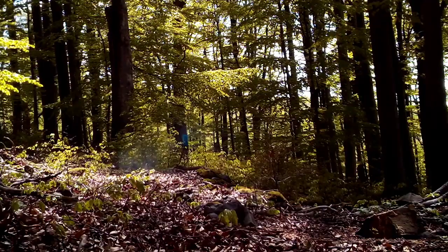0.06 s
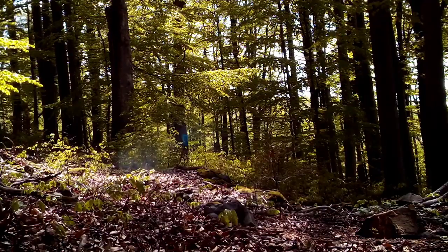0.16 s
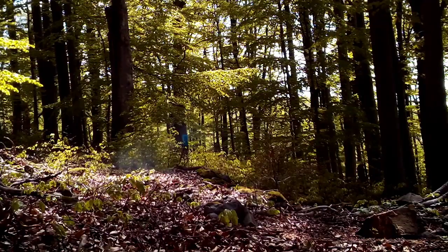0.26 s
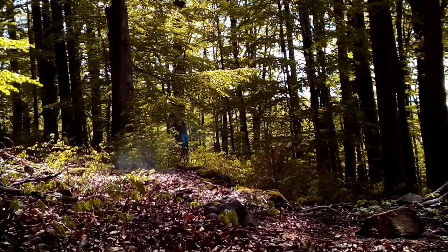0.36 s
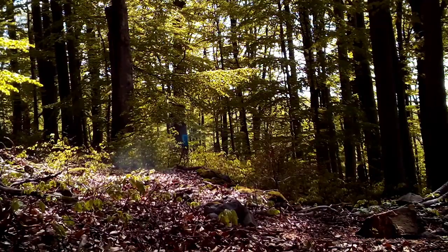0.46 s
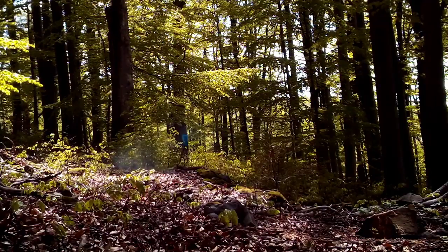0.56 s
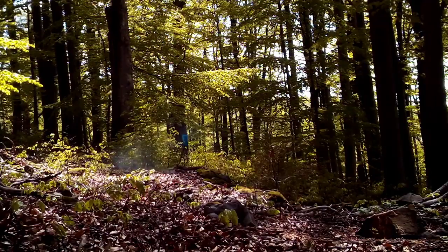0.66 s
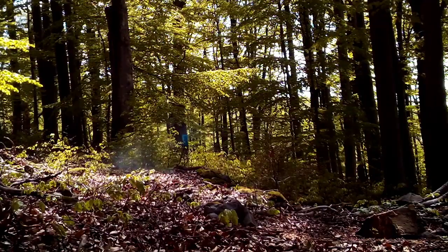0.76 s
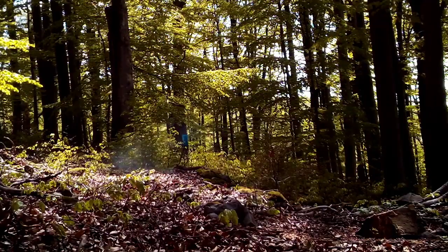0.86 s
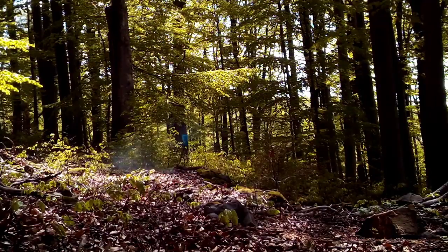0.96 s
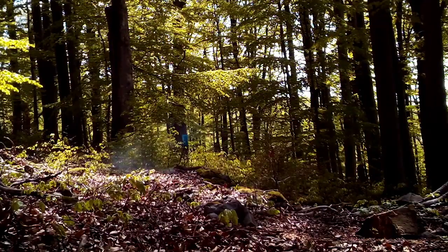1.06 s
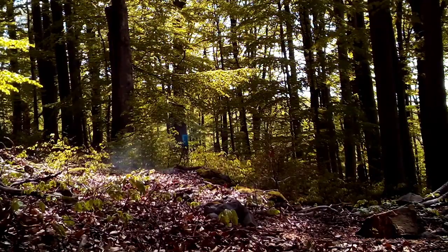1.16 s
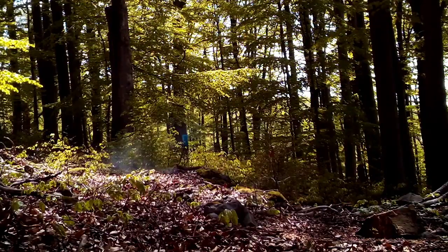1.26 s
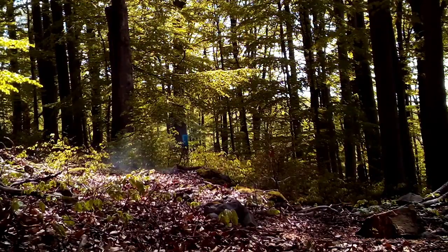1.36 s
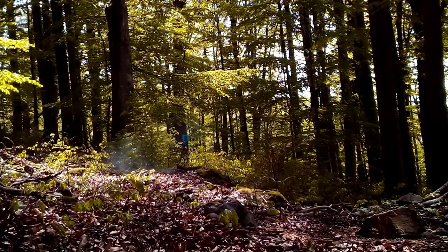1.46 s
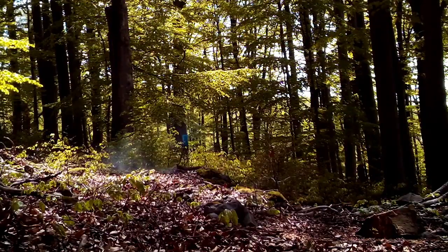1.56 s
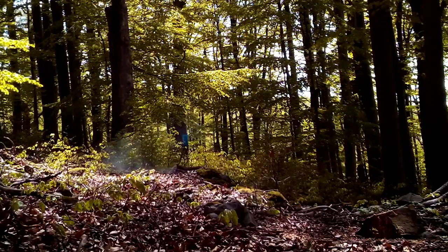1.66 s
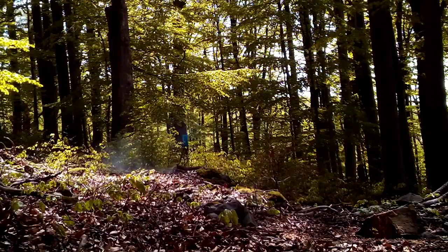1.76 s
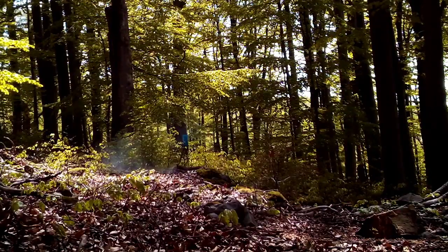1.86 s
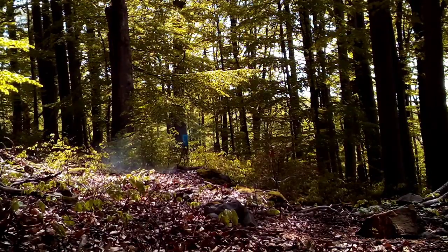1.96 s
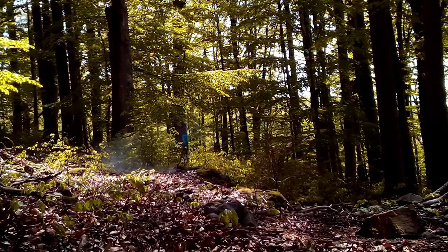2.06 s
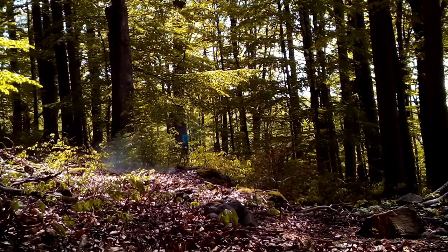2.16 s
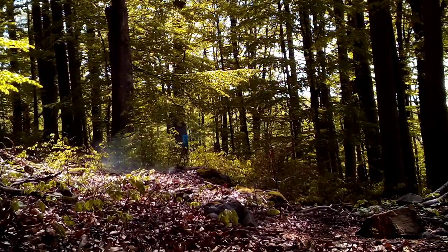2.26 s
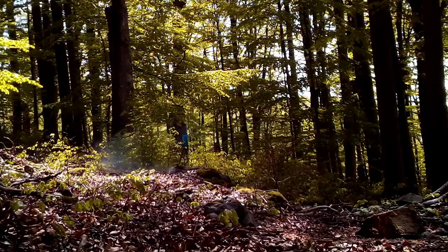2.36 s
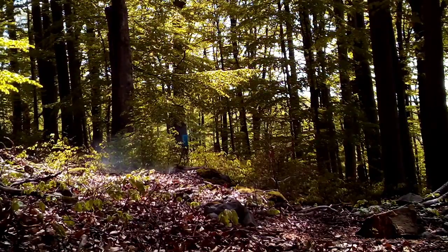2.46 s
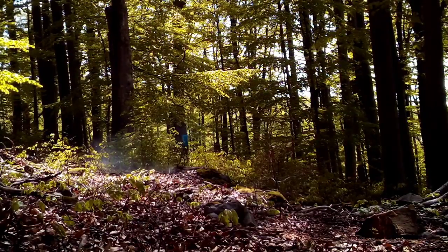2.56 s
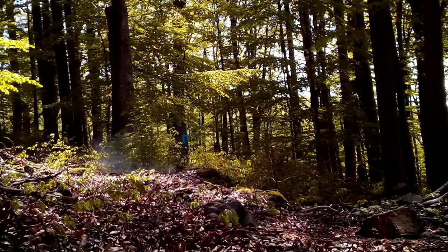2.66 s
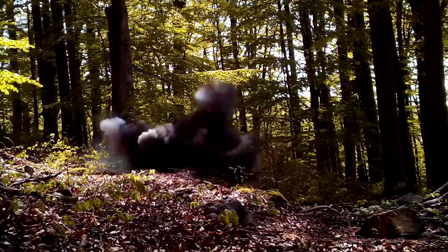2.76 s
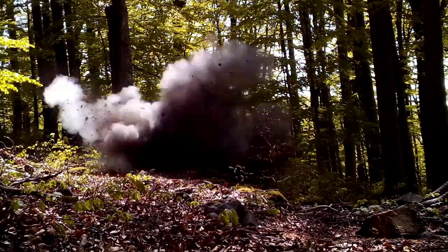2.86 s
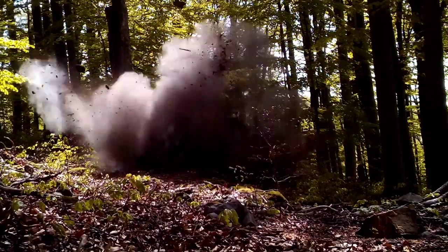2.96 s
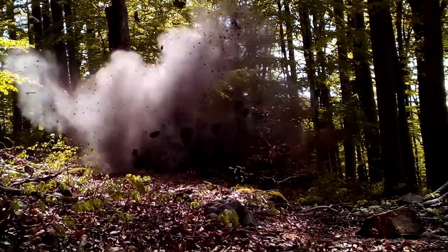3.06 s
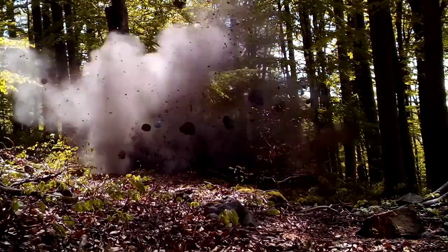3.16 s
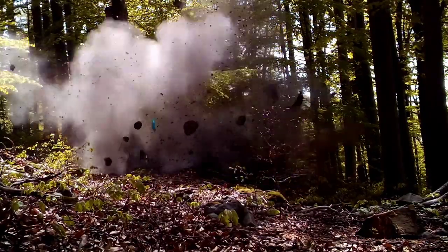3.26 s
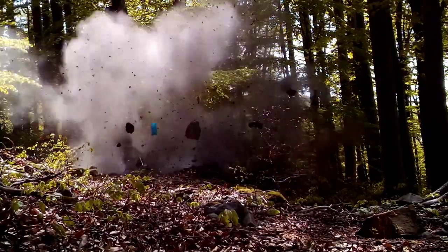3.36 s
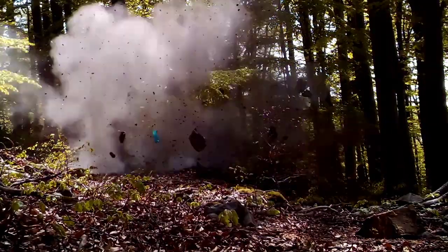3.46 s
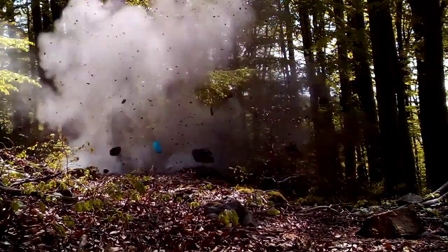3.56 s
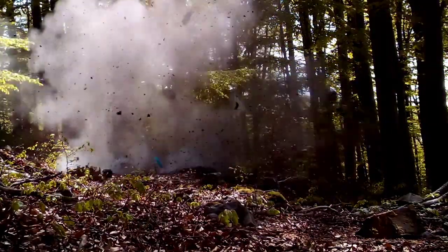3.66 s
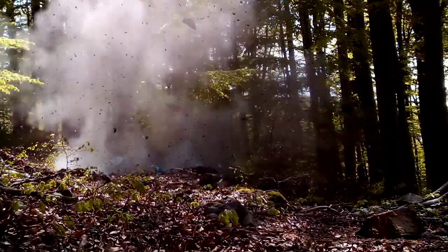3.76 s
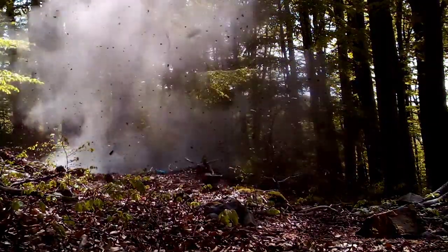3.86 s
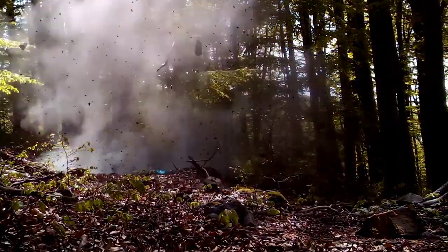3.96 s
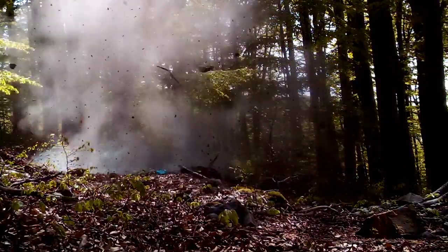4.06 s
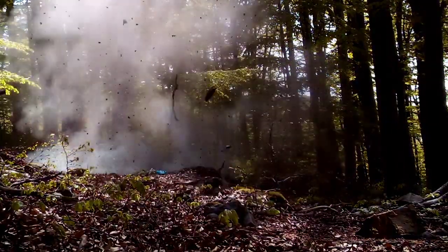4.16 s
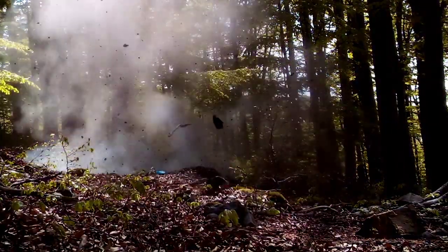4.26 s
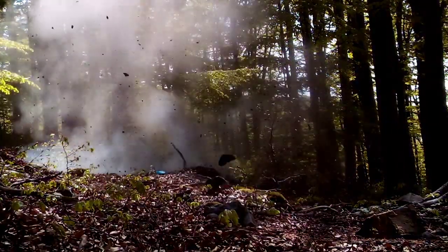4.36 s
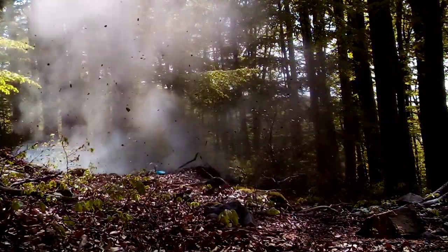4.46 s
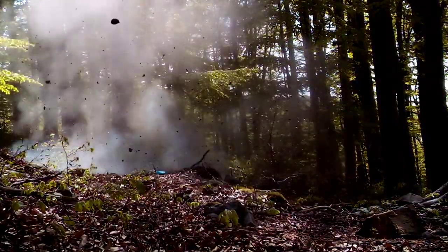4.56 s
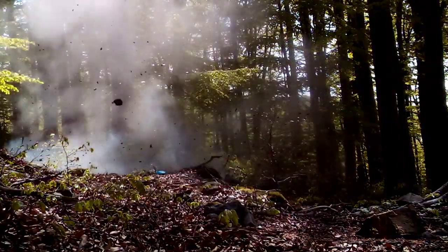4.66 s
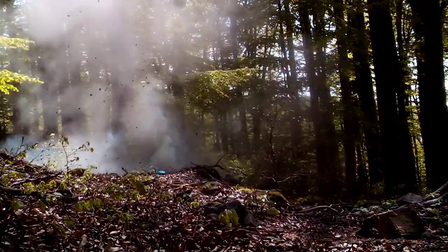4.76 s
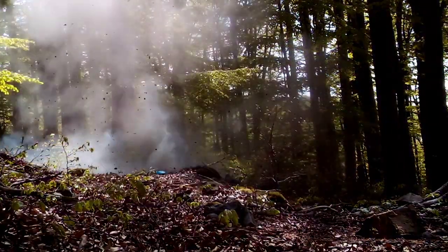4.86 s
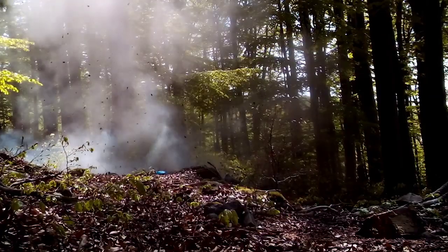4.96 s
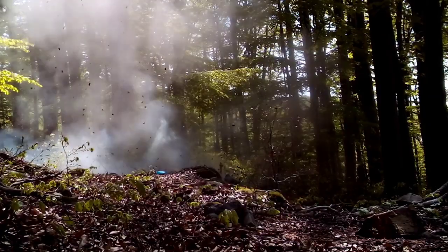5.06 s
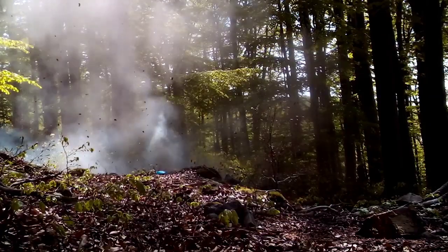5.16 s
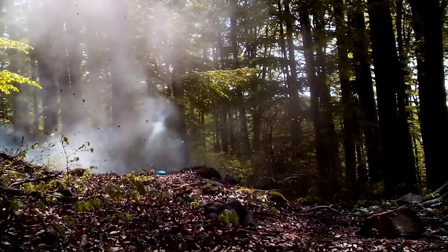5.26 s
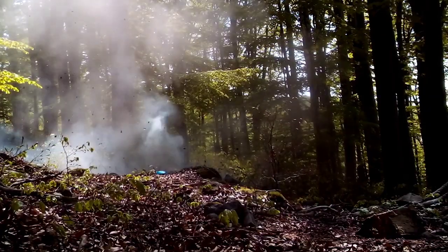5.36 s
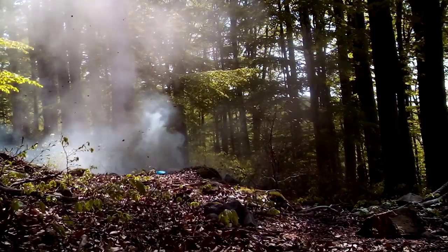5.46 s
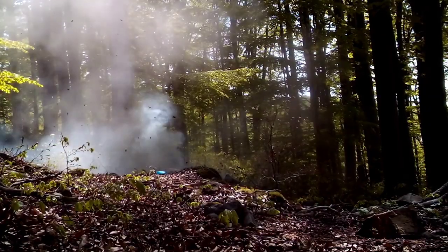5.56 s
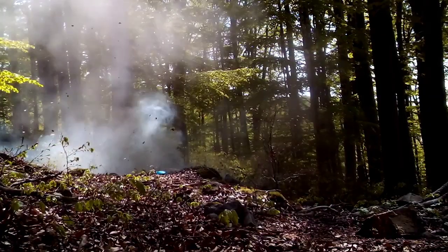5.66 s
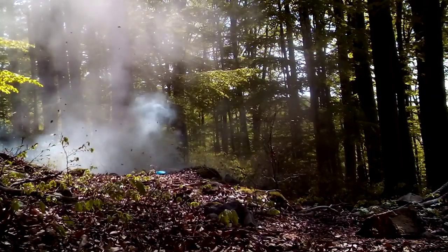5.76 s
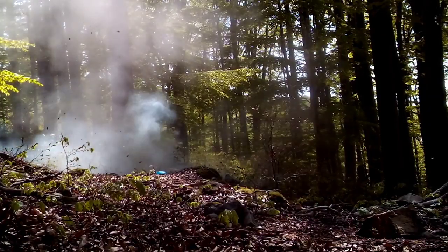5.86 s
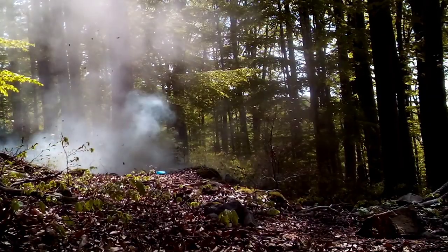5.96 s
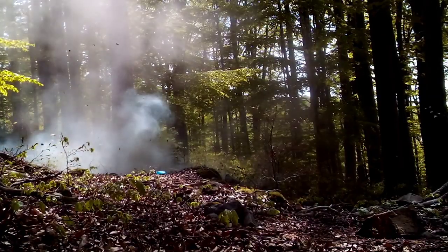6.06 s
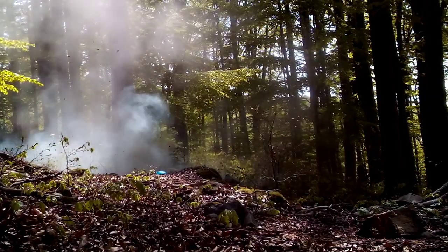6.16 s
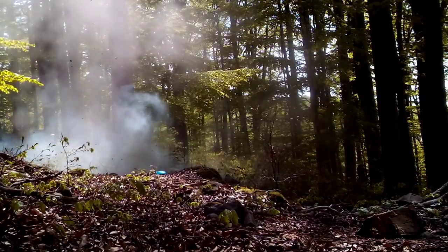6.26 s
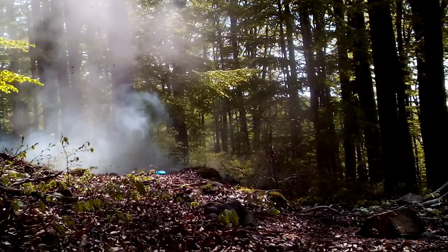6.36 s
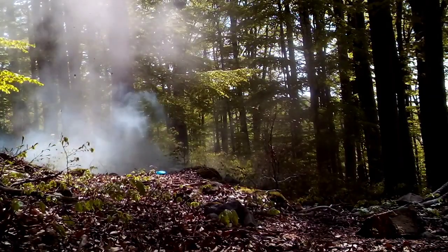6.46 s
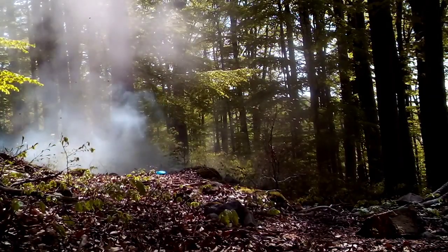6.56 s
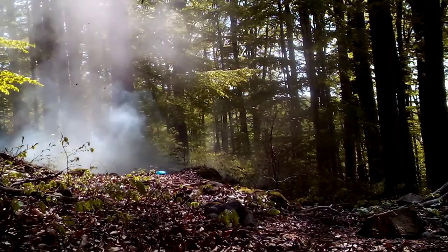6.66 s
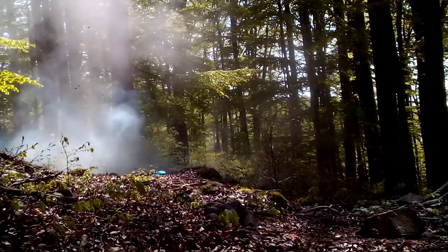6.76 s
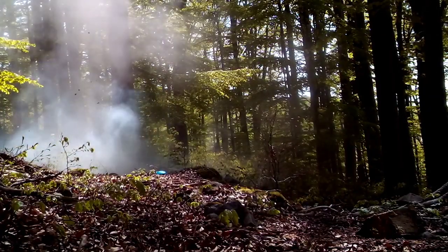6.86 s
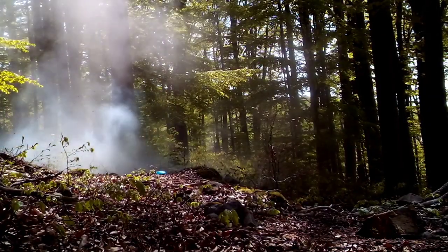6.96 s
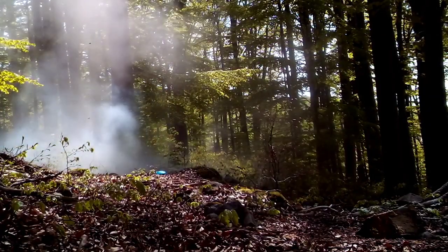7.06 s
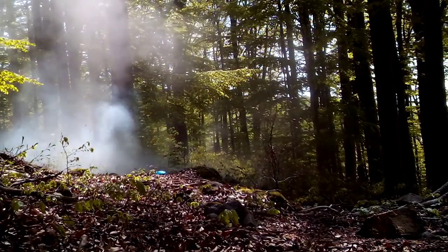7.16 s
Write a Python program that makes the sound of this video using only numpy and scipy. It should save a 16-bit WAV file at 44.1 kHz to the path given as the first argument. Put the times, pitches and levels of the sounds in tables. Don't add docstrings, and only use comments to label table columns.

```python
import sys
import numpy as np
from scipy import signal
from scipy.io import wavfile
from scipy.ndimage import uniform_filter1d

SR = 44100
rng = np.random.default_rng(int(sys.argv[2]) if len(sys.argv) > 2 else 0)


def dump(signal):
    limited = np.clip(np.atleast_2d(signal).T, -1, 1)
    pcm = np.round(limited * 32767).astype(np.int16)
    wavfile.write(sys.argv[1], SR, pcm)


def rack_gain(trim_db):
    fader = np.asarray(trim_db, float)
    return 10 ** (fader / 20)


N = 317520
T = np.arange(N) / SR

# [f/Hz, level/dB per Hz]
STILL_TONE = [(12, -48), (20, -31), (49, -1.5), (117, -0.5), (244, -6), (404, -10), (583, -13), (839, -15),
              (1080, -17.5), (5830, -24), (10200, -40), (13500, -37), (15000, -30), (16500, -50)]
# [f/Hz, level/dB]
MIC_TONE = [(20, -18), (60, 1.5), (6500, 1.5), (7400, -5), (8200, -12.5), (11000, -16), (13800, -27),
            (15000, -15.5), (15600, -23), (15900, -49), (17000, -55)]

# trills of one repeated note [t/s, spacing/s, level/dB, f/Hz], and notes in each
TRILLS = [
    (.3002, .0586, -58.5, 4290),
    (.4838, .059, -61.5, 3420),
]
TRILL_COUNTS = (10, 5)
# [length/s, arch/Hz, fall/Hz]
TRILL_SHAPES = [(.028, 150, 320), (0.033, 45, 60)]
LONG_SHAPE = (.1, 150, 120)
DIVE_SHAPE = (0.05, 350, 100)
FLAT_SHAPE = (.045, 22, 20)
BUZZ_SHAPE = (0.08, 123, 150)
DROP_SHAPE = (.07, -180, 1500)
# [t/s, level/dB, f/Hz]
LONGS = [
    (.9447, -57, 4450),
    (1.1473, -59, 4260),
    (1.3294, -61, 4240),
    (1.5753, -60.5, 4320),
]
DIVES = [
    (.832, -58, 3240),
    (.98, -49.5, 3210),
    (1.172, -48.5, 3230),
    (1.362, -49, 3230),
]
FLATS = [
    (.004, -64, 4660),
    (1.08, -59, 3550),
    (1.27, -68, 3500),
    (1.46, -68, 3480),
    (1.48, -73, 5950),
    (1.639, -49, 3340),
    (1.7, -63, 3350),
    (1.79, -70, 5870),
    (1.79, -65, 2900),
]
BUZZES = [
    (.19, -59, 5350),
    (.165, -60, 4850),
    (.19, -54, 4900),
    (.21, -56, 4750),
]
DROPS = [
    (.842, -57, 3450),
    (1.015, -53, 3400),
    (1.205, -52, 3350),
    (1.395, -55, 3350),
]

# [t/s, level/dB, coarseness 0-1]
SHOWER = [
    (3.3, -27.5, 0.15),
    (4.18, -33.5, 0.13),
    (4.69, -29.5, 0.56),
    (4.94, -32.5, 0.56),
    (5.42, -34, 0.32),
    (5.67, -39.5, 0.2),
    (6.4, -40, 0.16),
    (6.87, -49.5, 0.25),
    (7.2, -54, 0.36),
]
# [f/Hz, level/dB per Hz]
FINE_TONE = [(290, -35), (500, -5), (1000, -12), (1110, -8), (1220, -17), (2320, -12), (3900, -7),
             (7000, -11), (9100, -41.5), (15400, -120)]
COARSE_TONE = [(180, -33), (300, -9), (445, -2.5), (557, -9), (745, -5.5), (1380, -12.5), (3620, -15),
               (7000, -10.5), (9100, -42), (15400, -120)]
# [f/Hz, level/dB]
FAR_TONE = [(1000, -0.5), (1400, -7.5), (2200, -9.5), (3300, 0), (7000, -1.5), (9000, -4.5), (16000, -7.5)]
# [t/s, over/s]
THINNING = (4.77, 2.7)
DRIFT = (5.3, .4)
GRIT_HZ = [2900, 3400, 4000, 4500, 5100, 5700, 6300, 6900]
# [t/s, level/dB, decay/s, coarseness 0-1]
CLODS = [(3.8, -23.5, 0.14, 0.25), (4.1, -27.5, 0.086, .3), (4.3, -32, 0.11, 0.4), (4.58, -26, 0.1, .4),
         (4.925, -27, .05, 0.4), (5.127, -25, .012, 0.9), (5.194, -24, 0.0035, 0.1),
         (5.298, -20, .006, 0.8), (5.406, -16.5, 0.0097, 0.34), (5.415, -40, 0.012, .7),
         (5.479, -12.5, 0.0053, 0.55), (5.54, -25.5, 0.0092, 0.03), (5.637, -11.5, 0.0057, 0.5),
         (5.805, -24, 0.019, 0.27), (6.022, -9.5, 0.024, 0.57), (6.065, -25, 0.021, 0.2),
         (6.271, -27, 0.039, .1), (6.468, -29, 0.022, 0.15), (6.51, -30, 0.032, 0.5),
         (6.657, -27, 0.022, 0.6), (6.82, -36, 0.023, 0.6), (7.078, -37, .012, .7)]

# [t/s, peak level/dB,
# f/Hz]
TICKS = [(6.2896, -29, 8630), (6.3001, -26, 8290), (6.3405, -33, 8750), (6.4208, -35, 10100),
         (6.4687, -22, 14500), (6.495, -36, 11000), (6.5685, -42, 9610), (6.5855, -43, 10400),
         (6.6304, -39, 11000), (6.6633, -30, 9710), (6.672, -38, 11000), (6.8329, -31, 10000),
         (6.8329, -33, 13000), (7.0803, -47, 9210), (6.718, -37, 3600), (6.893, -40, 4000),
         (6.945, -40, 4600), (7.0085, -45, 4500), (7.0525, -38, 4800), (7.102, -42, 2500),
         (7.125, -41, 6300), (7.162, -45, 6200), (7.178, -40, 4500), (7.1875, -27, 9800),
         (7.1875, -38, 6500), (7.1866, -15, 14600)]
# [t/s, peak level/dB, f/Hz, t60/s]
PINGS = [(4.134, -21, 5000, .008), (4.18, -24, 4800, .008), (4.3555, -24, 6400, .008),
         (7.068, -36, 125, .12), (4.599, -20, 140, .15), (4.737, -24, 330, .05), (4.8535, -20, 3500, .008),
         (4.8865, -26, 2000, .01), (4.8975, -30, 2900, .01), (5.036, -28, 250, .08),
         (5.0962, -24, 1100, .015), (5.116, -32, 1500, .01), (5.1365, -20, 150, .07),
         (5.139, -30, 1500, .012), (5.147, -30, 1200, .01), (5.152, -22, 1700, .008),
         (5.1978, -20, 3100, .008), (5.1985, -26, 6600, .012), (5.2485, -16, 5800, .01),
         (5.2486, -16, 3700, .012), (5.259, -28, 4600, .012), (5.2865, -24, 5000, .008),
         (5.2866, -27, 3200, .006), (5.2995, -15, 1300, .006), (5.2993, -20, 2900, .006),
         (5.306, -28, 900, .012), (5.631, -26, 850, .012), (5.6395, -21, 5000, .012),
         (5.6405, -19, 3400, .015), (5.642, -15, 1100, .012), (5.654, -19, 1650, .016),
         (5.6543, -21, 3100, .009), (5.664, -25, 1000, .015), (5.692, -33, 3500, .015),
         (6.3387, -32, 2100, .006)]
# [t/s, peak level/dB, f/Hz]
SNAPS = [(3.771, -33, 9360), (3.8178, -27, 10200), (4.1323, -29.5, 9560), (4.2333, -32, 8800),
         (4.3279, -36, 9200), (4.3548, -29, 8530), (4.5766, -32, 9840), (4.8487, -25, 15400),
         (4.959, -23, 14900), (5.0182, -25.5, 8600), (5.0957, -30, 8540), (5.1964, -16.5, 14700),
         (5.2314, -36, 10200), (5.2476, -21, 10500), (5.2852, -41, 8510), (5.297, -42, 9650),
         (5.387, -39, 8820), (5.408, -29, 9240), (5.4803, -33, 8600), (5.5387, -36, 15400),
         (5.6374, -36, 15100), (5.816, -31, 8600), (5.9412, -43, 8510), (6.0045, -20.5, 8700),
         (6.0265, -27, 14700), (6.469, -29, 11500), (6.6636, -48, 9700), (6.6824, -35, 8300),
         (6.8332, -50, 10100), (7.187, -30, 14900)]
# [t/s, peak level/dB, ring f/Hz]
CHIPS = [(1.2364, -52, 3270), (1.263, -20.5, 6140), (5.003, -15, 4270), (5.2486, -15, 4600),
         (5.2583, -22, 4610), (5.2869, -23, 4660), (5.4101, -18, 6360), (5.5154, -21, 3200),
         (5.631, -21, 6700), (5.809, -25, 5020), (5.9418, -14.5, 6600), (6.0052, -8, 4070),
         (6.126, -21, 3830), (6.285, -24, 3650), (6.3387, -21.5, 4250), (6.4216, -33, 4340),
         (6.4631, -17.5, 5350), (6.6274, -29, 4540), (6.6312, -28.5, 2450), (6.662, -25, 3550),
         (6.683, -19.5, 4400), (6.7352, -29, 3800), (6.7562, -24.5, 4430), (6.824, -29, 3450),
         (6.8344, -18, 6060), (6.8653, -30, 3400), (6.8994, -20.5, 3830), (7.0816, -32, 4550),
         (7.1876, -28, 4100)]
# [thud level/dB against the click, thud f/Hz]
CHIP_THUD = (-44, 270)
# [t/s, peak level/dB, ring f/Hz, thud level/dB against the click, thud f/Hz]
STONES = [(3.8183, -8, 1860, -10, 115), (3.8494, -9, 2480, -8, 168), (4.1299, -17, 2270, -3, 205),
          (4.2304, -23, 1980, -1, 320), (4.356, -20.5, 1940, 0, 177), (4.4101, -20.5, 1520, -2, 135),
          (4.599, -30, 1790, -4, 138), (4.8864, -18, 1980, -2, 102), (4.897, -27, 2970, 2, 161),
          (4.9436, -25, 4470, 3, 355), (4.96, -15, 6370, -11.5, 213), (5.018, -10, 6140, -29, 170),
          (5.0958, -14, 4900, -13, 755), (5.1291, -14, 1100, -4, 142), (5.151, -21.5, 1570, -17, 204),
          (5.1973, -12.5, 2900, -6, 1240), (5.2991, -9, 2200, -10, 700), (5.4825, -12.5, 4430, -12.5, 815),
          (5.6391, -11, 3270, -4.5, 1180), (5.6538, -15, 1670, -11.5, 810), (5.6929, -28, 3430, -5, 229),
          (6.025, -17.5, 3850, -6, 415), (6.03, -13, 1800, -1, 500)]
# [f/Hz, level/dB, t60/s]
STONE_BLOW = (4.8495, 14.2, 0.00026)
STONE_MODES = [(291, -13.5, 0.064), (484, -3.5, 0.032), (700, 1, 0.012), (943, 1, 0.017), (1470, 0.5, 0.01),
               (2000, -2, 0.011), (2586, -6, 0.008), (4428, -23, .006)]
LOG_BLOW = (5.657, -10, 0.0095)
LOG_MODES = [(234, -3, 0.046), (366.4, 6.5, 0.032), (444, -5.5, 0.042)]

# [t/s, level/dB]
ROAR = [
    (2.9035, -3.5),
    (2.915, -5.5),
    (3.13, -11.5),
    (3.6, -14.5),
    (4.08, -21),
    (4.71, -32.5),
    (5.4, -41.5),
    (6.11, -45.5),
    (7.1, -66.5),
]
# [f/Hz, level/dB per Hz]
ROAR_TONE = [(120, -24), (200, -5.5), (243, -5), (415, -3.5), (481, -4), (730, -3.5), (1380, -8),
             (2150, -11.5), (3480, -11.5), (7000, -12), (9100, -36), (15400, -120)]
# [f/Hz, loss/dB per second]
AIR_LOSS = [(300, 1.5), (1000, 1), (2000, 3.5), (4000, 8.5), (7000, 27.5), (10000, 49), (13000, 81),
            (16000, 65)]
# [t/s, level/dB, rise/s, decay/s]
SLOPE_ECHO = (2.958, -.5, .001, 0.1087)
# [t/s, length/s]
BLANKS = [
    (2.9075, .0017),
    (2.9132, .002),
    (2.9475, .0015),
    (2.9518, .002),
    (2.9745, .0012),
]
# [t/s, peak level/dB, f/Hz, t60/s]
ANSWERS = [
    (2.9085, 13, 235, .035),
    (2.9612, 6, 750, .025),
    (2.9748, 12, 110, .06),
    (2.9885, 7, 113, .13),
    (3.0085, 7, 900, .012),
    (3.063, 3, 95, .2),
]

# [t/s, level/dB]
RUMBLE = [
    (2.9, -6),
    (3.05, -10),
    (3.14, -17),
    (3.45, -17.5),
    (4.0, -26),
    (4.6, -30.5),
    (4.95, -47.5),
    (6.25, -40.5),
    (7.2, -54),
]
# [f/Hz, level/dB per Hz]
RUMBLE_TONE = [(12, -70), (20, -23), (30, -8), (67, -2.5), (86, 1), (145, 2.5), (236, -7), (348, -11.5),
               (400, -11), (520, -31.5), (880, -120)]
# [t/s, level/dB]
THUMPS = [(2.925, -8), (2.965, -3), (3.05, -8), (3.4, -24), (4.03, -36), (4.595, -38), (4.74, -32),
          (5.025, -32), (5.128, -31), (5.298, -36), (5.655, -39.5), (5.88, -56), (6.92, -55),
          (7.075, -49.5)]
# [f/Hz, level/dB, t60/s]
CRATER_BLOW = (2.9138, 14.5, 0.001)
CRATER_MODES = [(95, -9, 0.6), (118, 0, 0.28), (205, -10, 0.3), (300, -14, 0.2), (62, -12, 0.87)]
SLOPE_BLOW = (2.9427, 15, .001)
SLOPE_MODES = [(138, 0, .2), (105, -12, .4)]
FAR_BLOW = (3.0268, 8.5, .002)
FAR_MODES = [(136, 0, .3)]
# [t/s, level/dB, f/Hz, length/s]
GROUND_WAVE = (2.866, -21, 95, .021)
# [t/s, level/dB, rise/s, push length/s]
SHOCKS = [
    (2.8869, 13, 0.00005, 0.0011),
    (2.889, 11, 0.0013, 0.0083),
    (2.8925, 15, 0.00007, 0.0017),
    (2.935, 6, 0.000043, 0.00023),
    (2.946, 2, .00005, .0002),
    (2.962, 5, 0.000065, 0.0003),
]


def evened(x):
    return x / np.sqrt(np.mean(x ** 2) + 1e-20)


def smooth_noise(size):
    return evened(uniform_filter1d(rng.standard_normal(N), size=size))


def read(points, hz):
    f, value = np.transpose(points)
    return np.interp(np.log(hz + 1), np.log(f + 1), value)


def add(mix, s, sound):
    part = mix[round(s * SR):][:len(sound)]
    part += sound[:len(part)]


def level(rows, column=1):
    rows = np.array(rows)
    return np.interp(T, rows[:, 0], rows[:, column], left=-150)


def coloured(x, tone):
    tone_db = read(tone, abs(np.fft.fftfreq(8192, 1 / SR)))
    log_gain = np.log(rack_gain(np.maximum(tone_db, -100)))
    taps = np.fft.ifft(np.exp(np.conj(signal.hilbert(log_gain)))).real[:4096]
    return signal.oaconvolve(x, taps)[:len(x)]


def ring(x, hz, t60):
    r = np.exp(-np.log(1000) / (t60 * SR))
    pole = r * np.exp(2j * np.pi * hz / SR)
    return (1 - r) * 2 * signal.lfilter([1], [1, -pole], x).real


def grains(per_s, spread_db):
    size = rack_gain(spread_db * np.minimum(rng.exponential(1, N), 5))
    hits = rng.random(N) < per_s / SR
    return evened(size * rng.choice([-1., 1.], N) * hits)


def damped_tones(rows):
    out, t = np.zeros(N), T[:8000]
    for s, db, hz, t60 in rows:
        add(out, s, rack_gain(db - 60 * t / t60) * np.sin(2 * np.pi * hz * t))
    return out


def knock(blow, modes):
    (s, db, rise), t = blow, T[:SR // 2]
    body = sum(rack_gain(mode_db - 60 * t / t60) * np.sin(2 * np.pi * hz * t) for hz, mode_db, t60 in modes)
    body = body * (1 - np.exp(-(t / rise) ** 2))
    crack = .5 * rng.standard_normal(len(t)) * np.exp(-t / 0.00057) * 0.0001 / rise
    out = np.zeros(N)
    add(out, s, rack_gain(db) * (body / abs(body).max() + crack))
    return out


def leaves(x):
    t = T[:6000]
    scatter = rng.standard_normal(len(t)) * rack_gain(-60 * t / 0.084) * 0.055 * (t > .003)
    return signal.oaconvolve(x, scatter)[:N]


def thinning(t):
    start_s, over_s = THINNING
    return np.clip((t - start_s) / over_s, .25, 1)


def patches_like(z, hz_bins, frames):
    across_pitch = uniform_filter1d(rng.standard_normal(z.shape), size=hz_bins, axis=0)
    return evened(uniform_filter1d(across_pitch, size=frames, axis=1))


def stillness():
    lumps = rack_gain(1.0 * smooth_noise(4000))
    return rack_gain(-64) * evened(lumps * coloured(rng.standard_normal(N), STILL_TONE))


def song():
    notes = []
    for (s, spacing, db, hz), count, shape in zip(TRILLS, TRILL_COUNTS, TRILL_SHAPES):
        for k in range(count):
            note_db = db + 1.5 * rng.standard_normal()
            note_hz = hz * (1 + 0.014 * rng.standard_normal())
            notes.append((s + k * spacing, note_db, note_hz) + tuple(shape))
    for rows, shape in ((LONGS, LONG_SHAPE), (DIVES, DIVE_SHAPE), (FLATS, FLAT_SHAPE),
                        (BUZZES, BUZZ_SHAPE), (DROPS, DROP_SHAPE)):
        notes += [tuple(row) + tuple(shape) for row in rows]
    return notes


def birds():
    out = np.zeros(N)
    waver_hz = 72 * smooth_noise(120)
    for s, db, hz, length, arch_hz, fall_hz in song():
        t = T[T < length]
        u = t / length
        pitch = hz + arch_hz * np.sin(np.pi * np.minimum(1.5 * u, 1)) - fall_hz * u ** 2
        pitch = pitch + waver_hz[round(s * SR):][:len(t)]
        flutter = 1 - 0.64 * np.sin(np.pi * 21 * t) ** 6
        shape = np.minimum(u / 0.095, 1) * (1 - u) ** 1.7 * flutter
        add(out, s - .004, rack_gain(db) * shape * np.sin(2 * np.pi * np.cumsum(pitch) / SR))
    t = T[:SR // 2]
    forest = rng.standard_normal(len(t)) * rack_gain(-60 * t / 0.38) * (t > .01)
    return out + rack_gain(-4.5) * signal.oaconvolve(out, forest / np.linalg.norm(forest))[:N]


def patchy(x, depth_db):
    hz, t, z = signal.stft(x, SR, nperseg=512)
    gain = rack_gain(depth_db * thinning(t) * patches_like(z, hz_bins=16, frames=6))
    return signal.istft(z * gain, SR, nperseg=512)[1][:N]


def grit():
    ticks = sum(evened(ring(grains(per_s=30, spread_db=3), hz, .003)) for hz in GRIT_HZ)
    return rack_gain(level(SHOWER) - 13) * evened(ticks) * (T > 4.0)


def steady_soil(fine, coarse):
    share = np.clip(level(SHOWER, column=2), 0, 1)
    soil = (1 - share) * fine + share * coarse
    away = np.clip((T - DRIFT[0]) / DRIFT[1], .5, 1)
    dull = coloured(soil, FAR_TONE[3:])
    distant = dull + away * (coloured(soil, FAR_TONE) - dull)
    steady = rack_gain(level(SHOWER) - 0.5) * patchy(distant, depth_db=6.0)
    clumps = evened(uniform_filter1d(smooth_noise(1500), size=1500))
    steady *= rack_gain(2 * thinning(T) * clumps)
    return steady * np.clip((T - SHOWER[0][0]) / 0.5, 0, 1)


def shower():
    wide = [(17000, -7.5)]
    fine = evened(coloured(grains(per_s=5000, spread_db=2.5), list(FINE_TONE[:-2]) + wide))
    coarse = evened(coloured(grains(per_s=3000, spread_db=3.0), list(COARSE_TONE[:-2]) + wide))
    fine_gain, coarse_gain, t = np.zeros(N), np.zeros(N), T[:SR // 4]
    for s, db, decay, share in CLODS:
        rise = 0.31 * decay
        gust = rack_gain(db) * (1 - np.exp(-t / rise)) * np.exp(-t / decay)
        add(fine_gain, s, np.clip(1 - share, 0, 1) * gust)
        add(coarse_gain, s, np.clip(share, 0, 1) * gust)
    clods = fine_gain * fine[::-1] + coarse_gain * coarse
    fall = steady_soil(fine, coarse) + grit() + clods
    return fall + 0.27 * leaves(fall)


def short_ticks():
    return damped_tones([tuple(row) + (.004,) for row in TICKS])


def pings():
    return damped_tones(PINGS)


def snaps():
    out, t = np.zeros(N), T[:600]
    for s, db, hz in SNAPS:
        burst = rng.standard_normal(len(t)) * np.exp(-t / 0.001)
        tick = ring(burst, hz, 0.0049 / 2)
        add(out, s, rack_gain(db + 14) * tick / abs(tick).max())
    return out


def pieces():
    out, t = np.zeros(N), T[:3000]
    rows = [tuple(row) for row in STONES] + [tuple(row) + tuple(CHIP_THUD) for row in CHIPS]
    for s, db, hz, thud_db, thud_hz in rows:
        burst = rng.standard_normal(len(t)) * np.exp(-t / 0.00095)
        edge = np.diff(burst, prepend=0)
        click = 0.44 * evened(edge) + evened(ring(burst, hz, 0.0021))
        click = signal.lfilter(*signal.butter(3, 0.5 * hz, "high", fs=SR), click)
        snap = np.diff(np.diff(edge, prepend=0), prepend=0)
        snap_db = -34 + 5 * rng.standard_normal() + 8 * np.log2(hz / 4000)
        crack = click / abs(click).max() + rack_gain(snap_db) * snap / abs(snap).max()
        thud = np.sin(2 * np.pi * thud_hz * t) * np.exp(-t * thud_hz / 1.37)
        add(out, s, rack_gain(db + 0.5) * (crack + rack_gain(thud_db) * thud))
    return out + 0.24 * leaves(out)


def debris():
    heavy = knock(STONE_BLOW, STONE_MODES) + knock(LOG_BLOW, LOG_MODES)
    return pieces() + snaps() + heavy + pings() + short_ticks()


def roar_level():
    s, db, rise, decay = SLOPE_ECHO
    t = np.maximum(T - s, 0)
    return rack_gain(level(ROAR)) + rack_gain(db) * (1 - np.exp(-t / rise)) * np.exp(-(t / decay) ** 2)


def roar():
    tone = list(ROAR_TONE[:-2]) + [(11000, -10.0), (17000, -10.0)]
    echoes = coloured(grains(per_s=6000, spread_db=2.5), tone)
    mid_band = signal.butter(2, [300, 1500], "band", fs=SR, output="sos")
    echoes /= np.std(signal.sosfilt(mid_band, echoes))
    hz, t, z = signal.stft(echoes, SR, nperseg=512)
    patches = patches_like(z, hz_bins=7, frames=10)
    patch_db = (.9 + 3.3 * thinning(t) ** 2) * patches
    air_db = read(AIR_LOSS, hz)[:, None] * np.clip(t - ROAR[0][0], 0, 3.6)
    treble = 1 / (1 + (2800 / (hz[:, None] + 1)) ** 4)
    shine_db = 3 * np.exp(-((t - SLOPE_ECHO[0] - .035) / 0.14) ** 2) * treble
    z = z * rack_gain(shine_db + patch_db - air_db)
    return roar_level() * signal.istft(z, SR, nperseg=512)[1][:N]


def blanking():
    pinned = sum((T > s) & (T < s + length) for s, length in BLANKS)
    return rack_gain(-20 * uniform_filter1d(pinned * 1., size=15))


def trunk_answers():
    return damped_tones(ANSWERS)


def rumble():
    swell = np.clip((T - RUMBLE[0][0]) / 0.0035, 0, 1)
    gain = rack_gain(level(RUMBLE))
    top_s = .014
    for s, db in THUMPS:
        gain = gain + rack_gain(db) * np.maximum(T - s, 0) / top_s * np.exp(1 - abs(T - s) / top_s)
    return swell * gain * evened(coloured(rng.standard_normal(N), RUMBLE_TONE))


def booms():
    crater = knock(CRATER_BLOW, CRATER_MODES)
    return crater + knock(SLOPE_BLOW, SLOPE_MODES) + knock(FAR_BLOW, FAR_MODES)


def blast():
    out, t = np.zeros(N), T[:2000]
    for s, db, rise, push in SHOCKS:
        u = t / push
        add(out, s, rack_gain(db) * (1 - np.exp(-t / rise)) * (1 - u) * np.exp(-.6 * u))
    tearing_gas = 2.95 * rng.standard_normal(400) * np.exp(-T[:400] / 0.00073)
    add(out, SHOCKS[0][0], tearing_gas)
    s, db, hz, length = GROUND_WAVE
    t = T[T < length]
    add(out, s, rack_gain(db) * np.sin(2 * np.pi * hz * t) * t / length)
    return out


def scene():
    falling = shower() + debris()
    charge = roar() * blanking() + trunk_answers() + rumble() + booms() + blast()
    return (coloured(birds() + falling + charge, MIC_TONE) + stillness())[None]


def low_pass(x):
    return signal.sosfilt(signal.butter(12, 16830, fs=SR, output="sos"), x)


def record(dry):
    peak_db = 20 * np.log10(abs(dry[0]) + 1e-9)
    fall = T * 160.0
    held_db = np.maximum.accumulate(peak_db + fall) - fall
    over_db = np.maximum(held_db + 3.5, 0)
    over_db = signal.lfilter([.006], [1, -.994], over_db)
    ducked = dry / rack_gain(0.74 * over_db)
    flat = ducked / (1 + abs(ducked) ** 5) ** .2
    flat = signal.oaconvolve(flat, signal.firwin(255, 16000, fs=SR)[None], "same")
    return low_pass(np.clip(flat, -1, 1))


dry = scene()
out = record(dry)
dump(out)
```